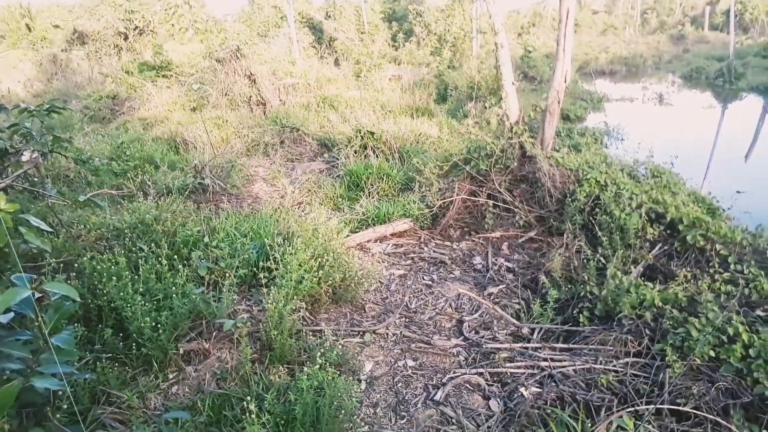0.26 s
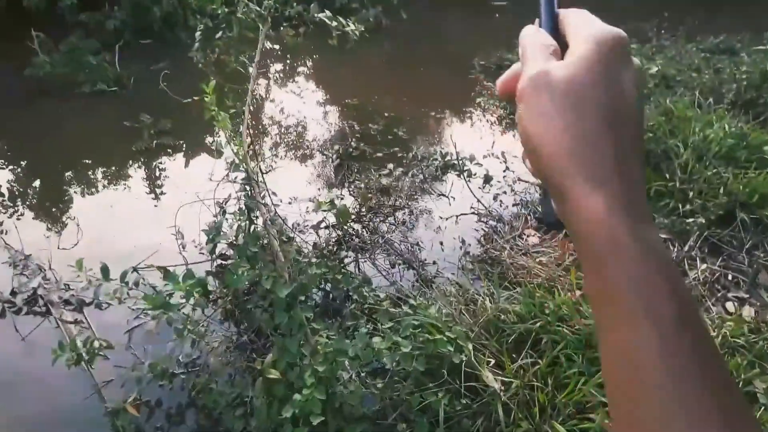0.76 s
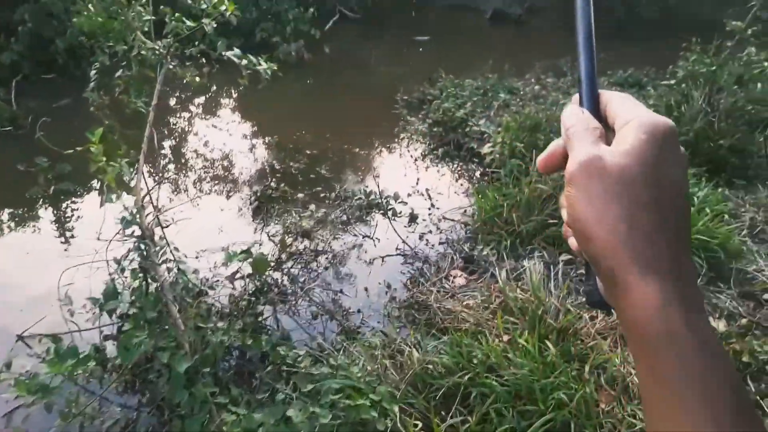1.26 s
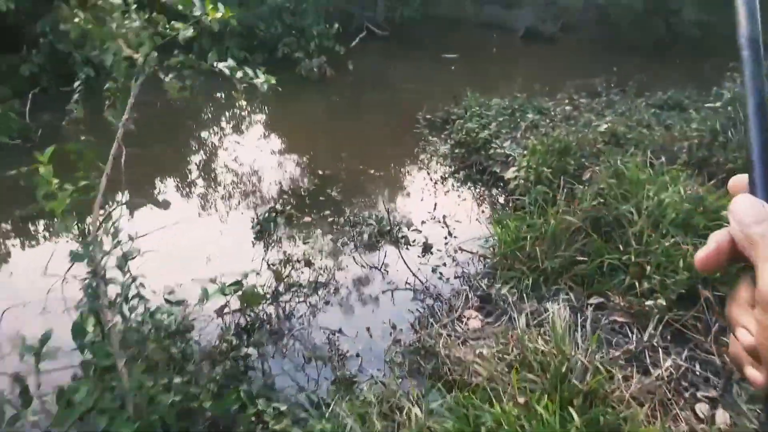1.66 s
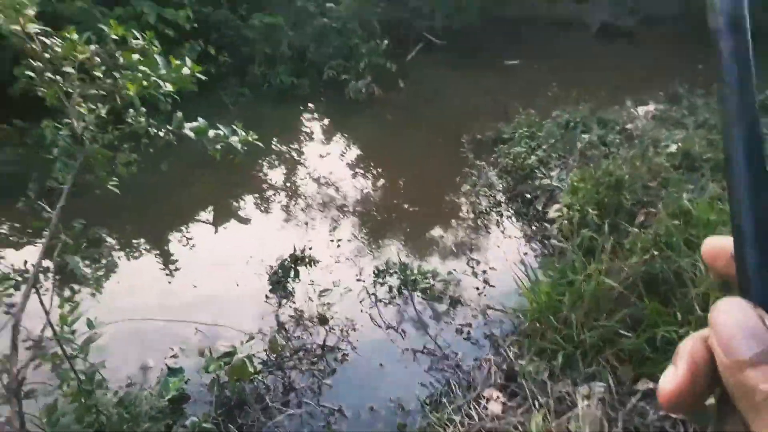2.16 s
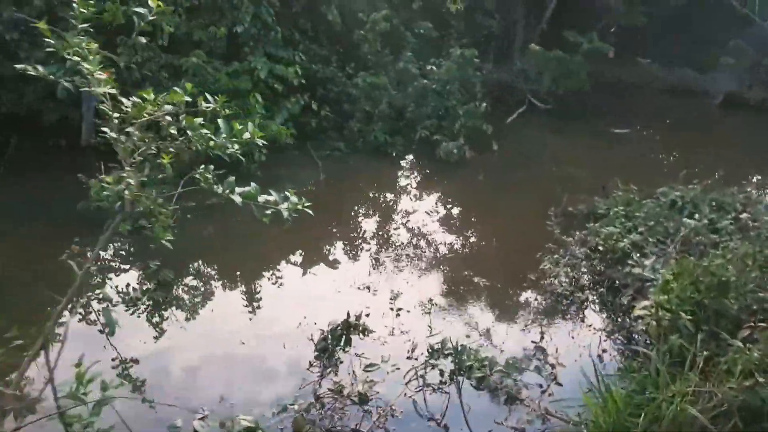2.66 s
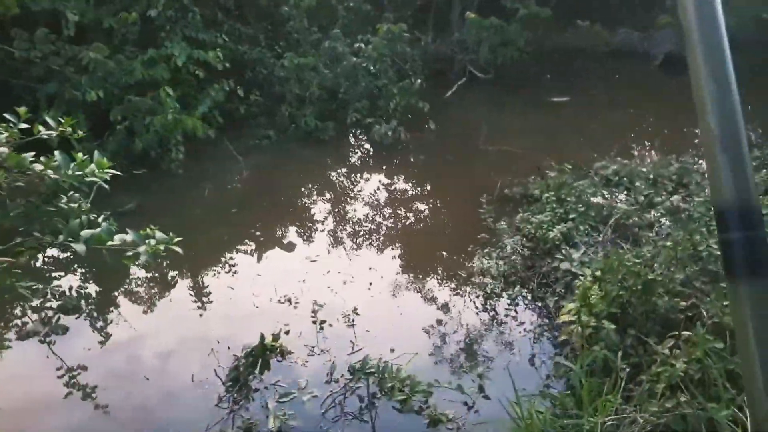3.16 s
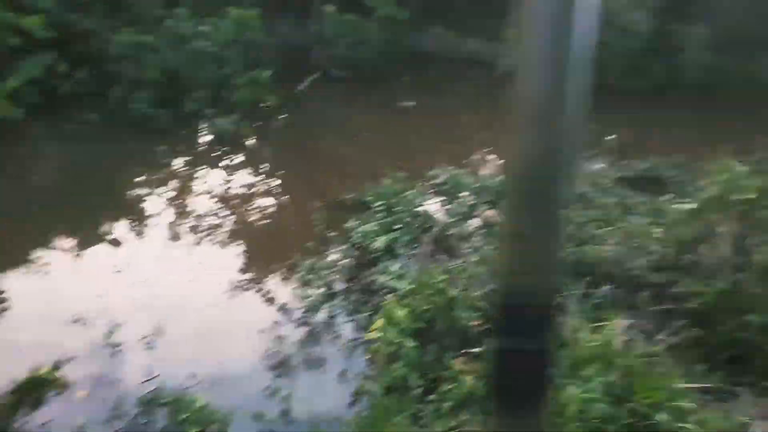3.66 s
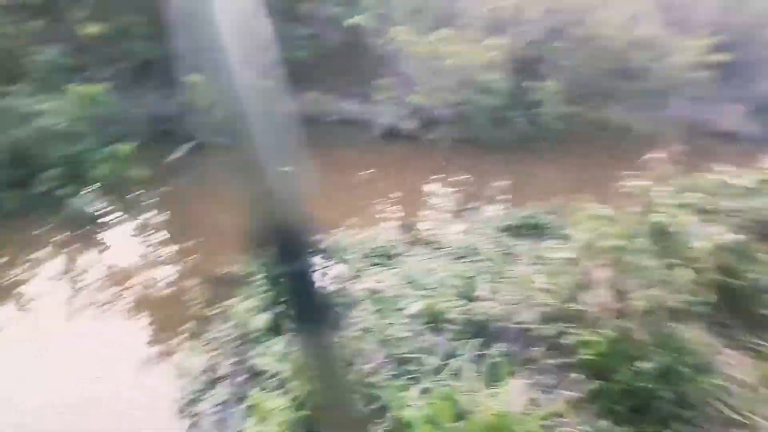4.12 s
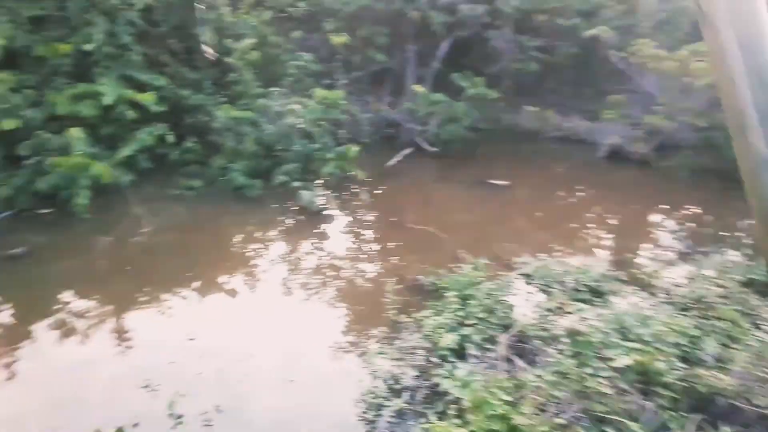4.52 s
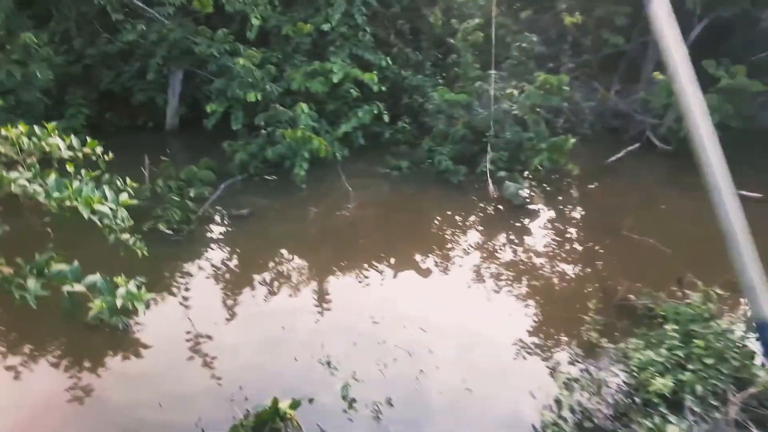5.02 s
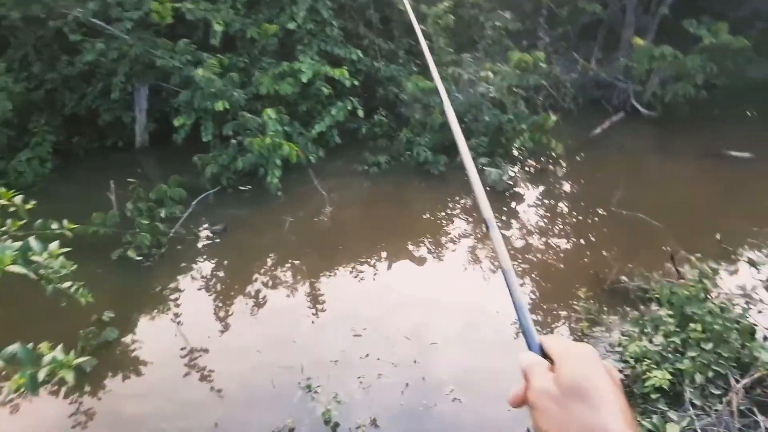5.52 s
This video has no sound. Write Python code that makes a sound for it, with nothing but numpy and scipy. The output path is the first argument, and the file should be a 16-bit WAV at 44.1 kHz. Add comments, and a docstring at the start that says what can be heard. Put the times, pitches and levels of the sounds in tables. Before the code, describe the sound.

Grass rustles and twigs crack under someone's steps outdoors, over high pulsing insects, faint bird chirps and a low far-off drone.

```python
"""Insects trill near 7 kHz and a small bird whistles over a faint wash of air. This quiet spot fades out,
and the bank of a creek fades in: insects and bird again, and a far murmur like traffic over a low drone.
Someone steps through grass and dry brush: blades rub by friction, dry leaves tick, and twigs fracture
and ring. The trills are tones modulated by wing strokes; they and the whistles scatter off the trees."""
import sys
import numpy as np
from scipy import signal
from scipy.fft import rfft, irfft
from scipy.io import wavfile
from scipy.ndimage import uniform_filter1d

SR = 44100
rng = np.random.default_rng(int(sys.argv[2]) if len(sys.argv) > 2 else 0)


def output_pcm(signal):
    """Save a mono or channel-first signal as 16-bit PCM at the path in sys.argv[1].

    Samples are clipped to [-1, 1] before scaling.
    """
    pcm = np.clip(np.atleast_2d(signal).T, -1, 1) * 32767
    wavfile.write(sys.argv[1], SR, np.round(pcm).astype(np.int16))


N = 255057
TIME = np.arange(N) / SR
BANK_START_S = 0.44  # the quiet spot gives way to the bank


def undb(db):
    """Amplitude ratio of a level in decibels."""
    return 10 ** (np.asarray(db) / 20)


def unit(x):
    """Normalisation to rms 1."""
    return x / np.sqrt(np.mean(x ** 2))


def curve(points):
    """Linear interpolation of (t/s, value) points at every sample."""
    return np.interp(TIME, *np.transpose(points))


def add(track, start_s, sound):
    """Superposition: a sound adds to the track from its starting time."""
    at = int(start_s * SR) + np.arange(len(sound))
    inside = (at >= 0) & (at < N)
    track[at[inside]] += sound[inside]


def colour(x, spectrum, size=4096):
    """Minimum-phase filtering to a response given as (f/Hz, level/dB) points."""
    hz, db = np.transpose(spectrum)
    bins_hz = np.fft.rfftfreq(size, 1 / SR)
    gain = undb(np.interp(np.log(bins_hz + 1), np.log(hz), db))
    cepstrum = irfft(np.log(gain))
    cepstrum[1:size // 2] *= 2  # folding the cepstrum makes the filter causal
    cepstrum[size // 2 + 1:] = 0
    return signal.fftconvolve(x, irfft(np.exp(rfft(cepstrum))))[:len(x)]


def ring(x, hz, q):
    """Response of a damped resonator with gain 1 at its centre."""
    return signal.lfilter(*signal.iirpeak(min(hz, SR / 3), max(q, 1), fs=SR), x)


def noise():
    """Gaussian white noise."""
    return rng.standard_normal(N)


def wander(per_s):
    """Smooth random modulation of rms 1 that changes about per_s times a second."""
    hold = int(SR / per_s)
    steps = np.repeat(rng.standard_normal(N // hold + 1), hold)[:N]
    return unit(uniform_filter1d(uniform_filter1d(steps, hold), hold))


def noise_band(hz, width_hz, order):
    """Narrow-band noise: low-pass noise modulates a carrier whose frequency may move."""
    lowpass = signal.butter(order, width_hz / 2, fs=SR, output="sos")
    envelope = signal.sosfilt(lowpass, noise() + 1j * noise())
    carrier = np.exp(2j * np.pi * np.cumsum(hz * np.ones(N)) / SR)
    return unit(np.real(envelope * carrier))


def crackle(per_s, spread_db):
    """A Poisson process of tiny fractures: many small impulses, a few large."""
    size = undb(spread_db * np.minimum(rng.exponential(size=N), 4))
    occurs = rng.random(N) < per_s / SR
    return unit(occurs * size * np.sign(noise()))


def air(level_db=-57):
    """Stationary coloured noise: the far wash of air at the quiet spot."""
    # spectrum of the wash: f/Hz, relative level/dB
    spectrum = [(25, -44), (80, -5), (130, -20.5), (270, -26.5), (490, -9), (570, -16), (900, -11.5),
                (1550, -28.5), (2500, -42), (5000, -33.5), (9000, -41.5), (16000, -40)]
    return unit(colour(noise(), spectrum)) * undb(level_db)


def drone():
    """Low-frequency noise, strongest near 95 Hz, under a slow envelope."""
    # envelope of the drone: t/s, level/dB
    levels = [(.6, -54), (1.2, -50), (1.95, -49), (2.25, -53), (3.9, -52), (4.55, -50), (5.78, -50.5)]
    # spectrum of the drone: f/Hz, relative level/dB
    spectrum = [(25, -45), (42, -16.5), (62, -8.5), (78, 0), (95, 1.5), (125, -2), (160, -11.5), (210, -13),
                (330, -17.5), (600, -43.5)]
    return unit(colour(noise(), spectrum)) * undb(curve(levels))


def murmur():
    """Broadband noise with slight random amplitude modulation, like far traffic."""
    # envelope of the murmur: t/s, level/dB
    levels = [(.6, -53), (1.0, -47.5), (2.9, -49), (4.2, -44.5), (5.3, -42.5), (5.78, -44)]
    # spectrum of the murmur: f/Hz, relative level/dB
    spectrum = [(30, -36), (160, -11), (250, -6), (380, -1), (550, 1.5), (900, 2), (1300, -2),
                (1700, -10.5), (2200, -18.5), (3000, -26.5), (6000, -35), (16000, -44)]
    return unit(colour(noise(), spectrum)) * undb(curve(levels) + 1.1 * wander(11))


def hollow_band(swell_s=0.081):
    """Narrow-band noise has a vague pitch: it drifts and swells like far tyres on a road."""
    # underlying envelope of the band: t/s, level/dB
    levels = [(.6, -54), (.8, -47.5), (1.2, -52), (2.702, -45), (2.95, -49.5), (3.3, -45.5), (4.15, -43.5),
              (4.9, -49.5), (5.3, -45), (5.55, -69)]
    # centre of the band: t/s, f/Hz
    centres = [(0.599, 820), (1.599, 745), (2.601, 765), (3.298, 820), (4.098, 790), (4.698, 900)]
    # Gaussian swells, down to 1/e at swell_s from the peak: peak t/s, level/dB
    peaks = [(1.35, -47.5), (1.53, -39), (1.7, -45.5), (1.86, -42.5), (2.16, -42), (2.51, -44)]
    swells = sum(undb(db) * np.exp(-((TIME - peak) / swell_s) ** 2) for peak, db in peaks)
    envelope = np.hypot(undb(curve(levels)), swells)
    return noise_band(curve(centres), width_hz=243, order=2) * envelope * undb(wander(14))


def through_trees(x, decay_s=0.04):
    """Scattering: trunks and leaves add a short, diffuse tail to the direct sound."""
    echoes = (noise() * np.exp(-TIME / decay_s))[:SR // 2]
    scattered = signal.fftconvolve(x, echoes / np.linalg.norm(echoes))[:N]
    return .85 * x + .45 * scattered


def bird(rasp_per_s=1100, flutter_db=2):
    """Whistles glide along parabolas in pitch; fast random frequency modulation makes them rasp."""
    # notes: onset t/s, duration/s, first f/Hz, middle f/Hz, last f/Hz, level/dB, rasp deviation/Hz
    notes = [(-.04, 0.12, 2050, 2080, 2150, -65, 47.52), (.121, 0.13, 5560, 5850, 5550, -56.5, 87),
             (0.23, 0.25, 5730, 5780, 5540, -59, 140), (0.128, 0.094, 4500, 4640, 4540, -72, 67),
             (0.465, 0.077, 4400, 4000, 3340, -55.5, 160), (0.596, 0.042, 3150, 2770, 2400, -60, 46.3),
             (.668, 0.0415, 3220, 3600, 3020, -43, 60), (0.682, 0.19, 2290, 2690, 2170, -53.5, 37.96),
             (0.868, .18, 3220, 3350, 3215, -58, 130), (.907, 0.21, 4900, 4900, 4170, -58, 130),
             (1.238, 0.032, 2800, 2660, 2430, -58.5, 46), (1.401, 0.13, 3600, 4110, 3660, -53, 230),
             (1.417, 0.08, 2930, 3030, 2280, -55, 130), (1.505, .045, 4950, 4520, 3960, -57.5, 46.3),
             (1.543, 0.21, 2380, 2703, 2380, -53, 25), (1.672, 0.031, 3300, 3430, 3100, -50.5, 93),
             (4.198, .23, 2150, 2220, 2220, -64.5, 69.12), (4.776, 0.17, 2352, 2255, 2150, -64, 108),
             (5.5, 0.09, 2170, 2280, 2140, -57, 99)]
    out = np.zeros(N)
    for start, length_s, first_hz, middle_hz, last_hz, db, rasp_hz in notes:
        progress = np.linspace(0, 1, int(length_s * SR))
        glide = np.polyfit([0, .5, 1], [first_hz, middle_hz, last_hz], 2)
        hz = np.polyval(glide, progress) + rasp_hz * wander(rasp_per_s)[:len(progress)]
        tone = np.sin(2 * np.pi * np.cumsum(hz) / SR)
        envelope = np.sqrt(progress * (1 - progress))
        add(out, start, undb(db) * unit(tone * envelope))
    return out * undb(flutter_db * wander(80))


def trill(length_s, hz, stroke_hz=50.4, sweep_hz=230.6, waver_hz=55, waver_db=1.5):
    """Stridulation: each wing stroke modulates a rasping tone in frequency and amplitude, no two alike."""
    t = np.arange(int(length_s * SR)) / SR
    stroke = np.sin(np.pi * (stroke_hz * t + rng.random())) ** 2
    pitch = hz + sweep_hz * (stroke - .75) + waver_hz * wander(60)[:len(t)]
    phase = 2 * np.pi * np.cumsum(pitch) / SR + .5 * wander(500)[:len(t)]
    envelope = signal.windows.tukey(len(t), .7) * undb(waver_db * wander(40)[:len(t)])
    return unit((0.18 + stroke) * np.sin(phase) * envelope)


def insects(chorus_db=-63, pitch_scatter_hz=51.2):
    """Near insects trill distinctly; many far ones sum incoherently to a band of noise."""
    # close trills at the quiet spot: onset t/s, duration/s, f/Hz, level/dB
    close_trills = [(-.05, 0.29, 7100, -60), (-.05, 0.4, 7500, -60.5), (0.225, .245, 7440, -46.5),
                    (0.264, 0.22, 6870, -60)]
    # two insects on the bank: first onset t/s, period/s, duration/s, f/Hz, first level/dB, last level/dB
    singers = [(.74, .443, 0.28, 7620, -64, -53), (1.237, 1.105, 0.22, 7100, -70, -61)]
    out = np.zeros(N)
    for start, length_s, hz, db in close_trills:
        add(out, start, undb(db) * trill(length_s, hz))
    for first, period_s, length_s, hz, first_db, last_db in singers:
        for start in np.arange(first, TIME[-1], period_s):
            db = np.interp(start, [first, TIME[-1]], [first_db, last_db])
            pitch = hz + pitch_scatter_hz * rng.standard_normal()
            add(out, start, undb(db) * trill(length_s, pitch))
    chorus = noise_band(7300, width_hz=800, order=4) * undb(wander(6))
    return out + undb(chorus_db) * chorus


def grass_blades(fits_db=1.24, surge_db=0.47):
    """Stick-slip friction: blades slide past each other in fits, giving impulses and hiss."""
    # spectrum of rubbing grass: f/Hz, relative level/dB
    spectrum = [(900, -23), (1800, -4.5), (2800, -6), (3700, -3), (6000, -1.5), (7200, -0.5), (8400, 2.5),
                (9600, -11.5), (12400, -3), (15600, -7.5)]
    friction = crackle(per_s=1500, spread_db=4.7) + .9 * noise()
    return unit(colour(friction, spectrum) * undb(fits_db * wander(110) + surge_db * wander(24.62)))


def dry_leaves():
    """Impulse excitation: tiny fractures make each kind of leaf or stalk tick at its own resonance."""
    # resonances of leaves and stalks: f/Hz, relative level/dB
    resonances = [(2400, -0.5), (3600, 1.5), (4500, 0), (6100, 0), (8100, -10.5), (13000, -19)]
    out = np.zeros(N)
    for hz, db in resonances:
        ticks = crackle(per_s=170, spread_db=4)
        out += undb(db) * unit(ring(ring(ticks, hz, q=2.0), hz, q=2.0))
    return unit(out)


def push_envelope(start, held_s, attack_s=0.031, release_s=0.038):
    """Exponential rise, hold and decay: blades bend under a push, then spring back."""
    rise = np.minimum(TIME - start, 0) / attack_s
    decay = np.maximum(TIME - start - held_s, 0) / release_s
    return np.exp(rise - decay)


def brush(gain_db=3.5, settling_blades_db=-72, settling_leaves_db=-75):
    """Incoherent sources add in power: each push of a leg, and trodden brush that keeps settling."""
    # pushes: onset t/s, hold/s, blade level before gain/dB, leaf level relative to blades/dB
    pushes = [(.55, 0.034, -52, -17), (.62, 0.057, -49, -12), (.76, .3, -55, -8.5), (1.13, .43, -63.5, -2),
              (1.731, 0.14, -45, -6), (1.931, .17, -54, -5), (2.29, .07, -56.5, -8),
              (2.46, 0.093, -64.5, -9), (2.63, 0.062, -52, -14), (2.725, 0.076, -48, -14),
              (2.88, .26, -61, -9), (3.2, 0.12, -66.5, -22), (3.58, 0.17, -57, -19),
              (3.831, 0.074, -51, -31), (3.93, 0.12, -61.5, -20), (4.125, 0.067, -56.5, -14),
              (4.37, 0.14, -67.5, 1.5), (4.8, 0.068, -68.5, -2), (4.934, 0.11, -53, -26),
              (5.14, 0.089, -58.5, -23), (5.33, 0.062, -54, -15), (5.46, 0.089, -63, -12),
              (5.69, 0.031, -65, -12)]
    blade_power, leaf_power = undb(settling_blades_db) ** 2, undb(settling_leaves_db) ** 2
    for start, held_s, db, leaves_db in pushes:
        push = undb(db) * push_envelope(start, held_s)
        blade_power += push ** 2
        leaf_power += (push * undb(leaves_db)) ** 2
    return undb(gain_db) * (grass_blades() * np.sqrt(blade_power) + dry_leaves() * np.sqrt(leaf_power))


def snap(tear_s, hz, knock_db, knock_hz=1070, ring_db=5, scatter_db=-24, scatter_s=0.023):
    """Brittle fracture: a crack and tearing fibres excite the wood; undergrowth scatters the sound."""
    # spectrum of a breaking twig: f/Hz, relative level/dB
    spectrum = [(400, -26), (1200, -23), (2600, 1), (3700, 6), (5000, 3), (8200, 7), (9700, -3), (12500, 2),
                (16000, -0.5)]
    t = np.arange(4096) / SR
    fibres, scatter = rng.standard_normal((2, len(t)))
    force = fibres * np.exp(-t / tear_s) + undb(scatter_db) * scatter * np.exp(-t / scatter_s)
    force[0] += 3  # the first crack
    crack = colour(force, spectrum)
    ringing = undb(ring_db) * ring(crack, hz, q=4.5)
    knock = ring(ring(force, knock_hz, q=1), knock_hz, q=1)
    sound = unit(crack + ringing) + undb(knock_db) * unit(knock)
    return sound * np.sqrt(SR * .005 / np.sum(sound ** 2))  # the energy of 5 ms at rms 1


def twigs(side_s=0.0046):
    """Decorrelation gives width: a brief side signal makes the start of a snap differ left and right."""
    # breaks: t/s, level over 5 ms/dB, tearing time/s, ring f/Hz, relative knock level/dB, width (0-1)
    breaks = [(0.758, -35, 0.0036, 5400, -3, 0.2), (0.799, -43, 0.0045, 7600, -21, 0.02),
              (.866, -34.5, 0.008, 7300, -5, .6), (.964, -42, .0014, 3000, -22, 0),
              (1.011, -37, 0.0053, 5350, -27, 0), (1.106, -42, 0.0047, 6500, -13, 0),
              (1.23, -47.5, 0.005, 7540, -24, 0.01), (1.749, -30.5, 0.003, 5450, -35, 0.27),
              (1.762, -34.5, .001, 4970, -5, 0), (1.8376, -27, 0.0037, 3900, -14, 0),
              (1.9148, -22, 0.00022, 3860, -10.5, 0.01), (1.97, -35, .002, 7900, -15, 0),
              (2.012, -37, 0.0023, 7400, -5, 0), (2.095, -43, 0.011, 9000, -22, 0),
              (2.218, -45.5, 0.0022, 8000, -6, 0.06), (2.7193, -41, 0.0014, 3600, 2, 0),
              (3.1312, -37, 0.00095, 8720, -33, 0.15), (4.798, -47.5, 0.0047, 6600, -25, 0.05),
              (5.123, -43.5, 0.0074, 8100, -14, 0.03), (5.399, -43, 0.0021, 3400, 6, 0),
              (5.452, -35.5, .0015, 3020, -2.5, 0.24), (5.458, -40, 0.0069, 8450, -7, 0.2),
              (5.554, -51, 0.0028, 2620, -20, 0.02), (5.719, -45.5, .003, 4100, 1, 0.01)]
    left, right = np.zeros((2, N))
    for start, db, tear_s, hz, knock_db, width in breaks:
        mid = undb(db) * snap(tear_s, hz, knock_db)
        side = undb(db) * width * snap(tear_s, hz, knock_db=-48)
        side *= np.exp(-(TIME[:len(side)] / side_s) ** 2)
        add(left, start, mid + side)
        add(right, start, mid - side)
    return np.array([left, right])


def scene():
    """Superposition of the sources at the quiet spot, then on the bank; only the snaps have width."""
    quiet_spot = air()
    bank = murmur() + hollow_band() + drone() + brush()
    calls = through_trees(insects() + bird())
    return np.where(TIME < BANK_START_S, quiet_spot, bank) + calls + twigs()


def record(dry, fade_out_s=0.28, fade_in_s=0.19, cutoff_hz=15900):
    """Linear fades through silence join the two spots; a steep low-pass filter limits the bandwidth."""
    fade_out = (BANK_START_S - TIME) / fade_out_s
    fade_in = (TIME - BANK_START_S) / fade_in_s
    fade = np.clip(np.maximum(fade_out, fade_in), 0, 1)
    lowpass = signal.ellip(10, .2, 80, cutoff_hz, fs=SR, output="sos")
    return signal.sosfilt(lowpass, dry * fade)


dry = scene()
out = record(dry)
output_pcm(out)
```